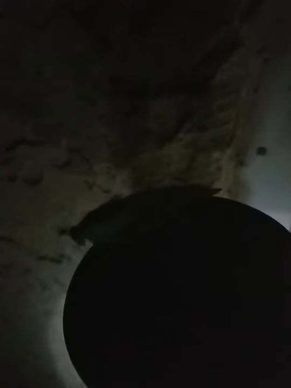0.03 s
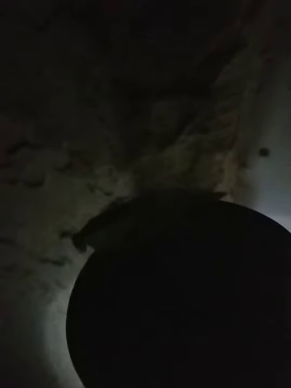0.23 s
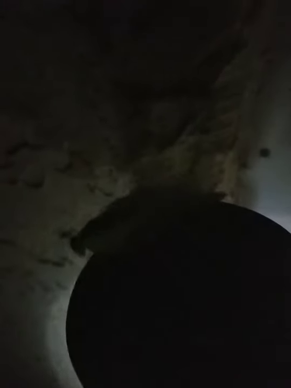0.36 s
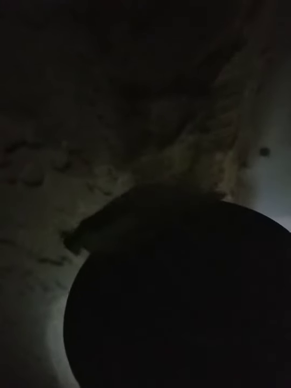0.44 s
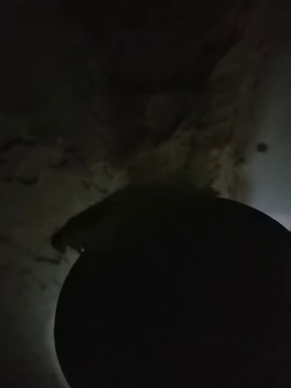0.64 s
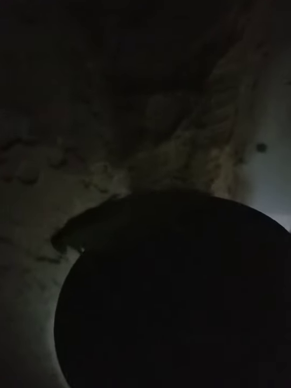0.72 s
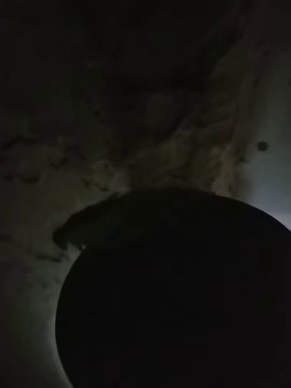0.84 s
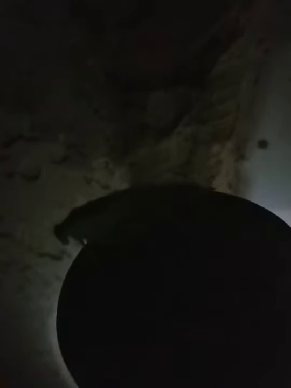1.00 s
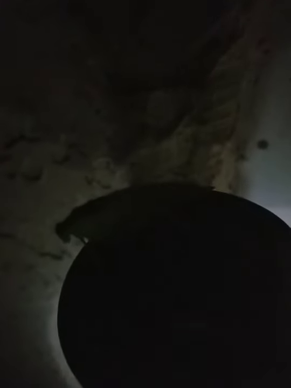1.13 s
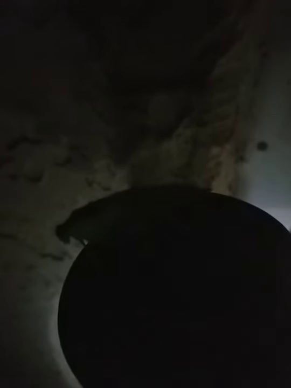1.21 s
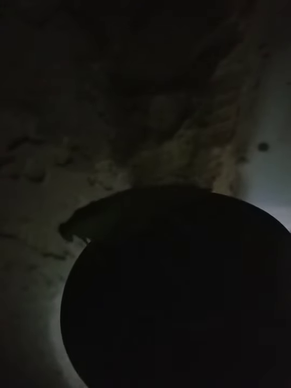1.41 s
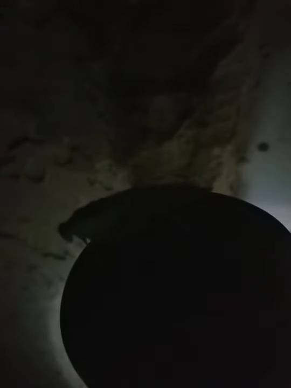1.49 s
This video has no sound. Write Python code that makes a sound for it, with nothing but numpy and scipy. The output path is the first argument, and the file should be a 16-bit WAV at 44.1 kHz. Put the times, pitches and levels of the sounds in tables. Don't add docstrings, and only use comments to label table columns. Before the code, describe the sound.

A katydid very close to a stereo microphone gives two faint ticks, then five dry, buzzing rasps in quick succession, with short outdoor echoes; low traffic rumble and faint crickets sit behind, dropping sharply as the song begins.

```python
import sys
import numpy as np
from scipy import signal
from scipy.fft import rfft, irfft, next_fast_len
from scipy.io import wavfile
from scipy.ndimage import uniform_filter1d, minimum_filter1d

SR = 44100
rng = np.random.default_rng(int(sys.argv[2]) if len(sys.argv) > 2 else 0)


def field_ratio(decibels):
    return 10 ** (np.asarray(decibels, dtype=float) / 20)


def wav_out(sig):
    wavfile.write(sys.argv[1], SR, np.round(np.clip(np.atleast_2d(sig).T, -1, 1) * 32767).astype(np.int16))


N = 68355
TIME_S = np.arange(N) / SR
OPPOSITE = np.array([[1], [-1]])

# (time [s], gain [dB])
GAIN_CURVE = [
    (0, 1.5),
    (0.2403, 1),
    (0.2415, -19),
    (.293, -15.5),
    (0.299, -19),
    (.318, -18.5),
    (.323, -23.5),
    (.68, -27),
    (.76, -24.5),
    (1.55, -24.5),
]
# (frequency [Hz], level [dB], t60 [s], growth over the stroke [dB],
# left over right [dB], left lag [samples])
WING_MODES = [(7935, -17, 0.0083, -4, -2, -5), (8220, -23.5, 0.012, -6, -2, -5),
              (6400, -22, .003, -6.5, 0.5, -6), (9376, -21.5, .004, 15.5, -2, 10),
              (10950, -8.5, 0.0023, -3, -3.5, 9), (12265, -11, .002, 9, 1.5, 8),
              (13800, -15.5, .002, 1.5, -3.5, 8), (15300, -28.5, .002, 2, -6.5, 12.5),
              (4700, -32.5, 0.0018, 28, 0, -23), (3240, -32.5, 0.0014, 21, -4, -25),
              (1828, -31, 0.0021, 22.5, -7, -24.5), (1200, -39.5, .005, 18.5, -5.5, -26.5),
              (550, -42, 0.0038, 17.5, -6, -20)]
BODY_TOP_HZ = 5000


def rms_one(x):
    return x / np.sqrt(np.mean(x ** 2) + 1e-20)


def at_hz(points, hz):
    table_hz, values = np.transpose(points)
    return np.interp(np.log(hz), np.log(table_hz + 1e-3), values)


def drift(rate_hz):
    r = np.exp(-2 * np.pi * rate_hz / SR)
    slow = signal.lfilter([1], [1, -2 * r, r * r], rng.standard_normal(N + SR))
    return rms_one(slow[SR:])


def band(x, low_hz, high_hz):
    return signal.sosfilt(signal.butter(2, [low_hz, high_hz], "band", fs=SR, output="sos"), x)


def rumble():
    # (frequency [Hz], density [dB per Hz])
    spectrum = [(42, -38), (62, -4.5), (165, -11.5), (215, -8.5), (330, -23), (670, -20.5), (1300, -29.5),
                (2200, -23)]
    # (frequency [Hz], left-right likeness [-1 to 1])
    likeness = [(60, 0.99), (240, 0.98), (950, 0.42), (3770, -0.03), (15000, -0.03)]
    out = 0
    edges = 30 * 2 ** np.arange(0, 6.6, .5)
    white = rng.standard_normal((2, 2, N))
    for k, (low, high) in enumerate(zip(edges, edges[1:])):
        mid, side = band(white[k % 2], low, high)
        hz = np.sqrt(low * high)
        alike = np.clip(at_hz(likeness, hz), -1, 1)
        stereo = np.sqrt(1 + alike) * mid + np.sqrt(1 - alike) * side * OPPOSITE
        out = out + field_ratio(at_hz(spectrum, hz) + 0.5 * drift(24)) * stereo
    dulled = signal.sosfilt(signal.butter(4, 1250, fs=SR, output="sos"), out)
    return field_ratio(-38.5) * rms_one(dulled)


def drone():
    # (time [s], level [dB])
    swell = [
        (0, -56),
        (.7, -46.5),
        (.8, -42),
        (1.02, -37.5),
        (1.08, -47.5),
        (1.16, -46.5),
        (1.26, -47.5),
        (1.55, -44.5),
    ]
    center_hz, width_hz = 68.03, 23
    hum = band(rng.standard_normal(N), center_hz - width_hz / 2, center_hz + width_hz / 2)
    return field_ratio(np.interp(TIME_S, *np.transpose(swell))) * rms_one(hum)


def crickets():
    # (frequency [Hz], width [Hz], level [dB], throb rate [Hz], throb depth [dB])
    choruses = [(2665, 503, -52.5, 35, 2), (4706, 560, -53, 40, 2.5), (5780, 660, -61, 30, 2)]
    hiss = band(rng.standard_normal((2, N)), 6000, 15900)
    out = field_ratio(-65) * rms_one(hiss)
    for hz, width_hz, db, rate_hz, throb_db in choruses:
        edges = hz - width_hz / 2, hz + width_hz / 2
        mid, side = band(band(rng.standard_normal((2, N)), *edges), *edges)
        out += field_ratio(db + throb_db * drift(rate_hz)) * rms_one(mid + 0.23 * side * OPPOSITE)
    return out


def air():
    level_db, sink_share = -58, .6
    gain_db = np.interp(TIME_S, *np.transpose(GAIN_CURVE))
    noise = band(rng.standard_normal((2, N)), 1500, 6200)
    return field_ratio(level_db + sink_share * gain_db) * rms_one(noise)


def teeth():
    # (time [s], level [dB])
    ticks = [
        (0.1981, -35),
        (.2022, -24.5),
    ]
    # (first touch [s], full grip [s], last catch [s])
    strokes = [
        (.2418, .2525, .2908),
        (.3205, .328, .3785),
        (.4115, .4205, .4675),
        (.503, .511, .5625),
        (.598, .606, .6515),
    ]
    # (level [dB], body thump [dB])
    effort = [
        (29.6, -2),
        (30.5, 1.5),
        (29.9, 4),
        (26.9, 4),
        (31, 4.5),
    ]
    soft_gap_s, firm_gap_s, late_gap_s = .0012, .0019, .0023
    jitter_early, jitter_late = .07, .3
    catch_pause_s, rebound_s = .004, .0012
    tooth_spread_db, catch_db = 1.5, 3

    rows = [(s, db, 1.1, -30, *np.zeros(len(WING_MODES))) for s, db in ticks]
    for (touch, grip, catch), (db, thump_db) in zip(strokes, effort):
        chance = rng.standard_normal((60, 2 + len(WING_MODES)))
        for k, s in enumerate(np.arange(touch, grip - firm_gap_s, soft_gap_s)):
            own = chance[-k - 3]
            soft_db = np.interp(s, [touch, grip], [-17, -7])
            late_s = jitter_early * soft_gap_s * own[0]
            rows.append((s + late_s, db + soft_db, .6, thump_db - 11.5, *own[2:]))
        s, k = grip, 0
        while s < catch - catch_pause_s:
            own = chance[k]
            done = (s - grip) / (catch - grip)
            rows.append((s, db + tooth_spread_db * own[1], done, thump_db, *own[2:]))
            gap_s = firm_gap_s + (late_gap_s - firm_gap_s) * done
            jitter = jitter_early + (jitter_late - jitter_early) * done
            s += gap_s * np.exp(jitter * own[0])
            k += 1
        end_db, end_thump_db = db + catch_db, thump_db - 13.5
        rows.append((catch, end_db, 1.2, end_thump_db, *chance[-1, 2:]))
        rows.append((catch + rebound_s, end_db - 6, 1.2, end_thump_db, *chance[-2, 2:]))
    return np.transpose(rows)


def resonance(force, hz, t60):
    r, w = field_ratio(-60 / (t60 * SR)), 2 * np.pi * hz / SR
    ringing = signal.lfilter([0, np.sin(w)], [1, -2 * r * np.cos(w), r * r], force + 1e-18)
    return band(ringing, hz / 1.45, min(hz * 1.7, .45 * SR))


def delayed(x, lag):
    size = next_fast_len(N)
    turn = np.exp(-2j * np.pi * np.arange(size // 2 + 1) / size * lag)
    return irfft(rfft(x, size) * turn, size)[:N]


def katydid():
    mirror_delay_s, mirror_top_hz = .0004, 9000
    mode_spread_db, scrape_db, scrape_s = 2.0, -18, .0008
    s, db, done, thump_db, *chance = teeth()
    out = np.zeros((2, N))
    smear = np.exp(-np.arange(300) / (SR * scrape_s))
    for k, (mode, own) in enumerate(zip(WING_MODES, chance)):
        hz, level_db, t60, growth_db, pan_db, lag = mode
        in_body = hz < BODY_TOP_HZ
        at = ((s + mirror_delay_s * (hz < mirror_top_hz)) * SR).astype(int)
        hit_db = db + level_db + growth_db * (done - .5) + mode_spread_db * own + thump_db * in_body
        hits = np.zeros(N)
        hits[at] = (-1) ** (k // 2) * field_ratio(hit_db)
        shared, apart = rng.standard_normal((2, N))
        rubbing = shared + (.3 + .5 * in_body) * apart * OPPOSITE
        force = hits + field_ratio(scrape_db) * np.convolve(hits, smear)[:N] * rubbing
        left, right = resonance(force, hz, t60)
        left = delayed(left, lag)
        out += [left * field_ratio(pan_db / 2), right * field_ratio(-pan_db / 2)]
    return out


def walls(x):
    near_delay_s, pan_db = .002, -2
    t = np.arange(SR // 2) / SR

    def tail(db, t60):
        noise = rng.standard_normal((2, len(t))) / np.sqrt(t60 * SR / np.log(1e6))
        return (t > near_delay_s) * field_ratio(db - 60 * t / t60) * noise

    bright = signal.lfilter(*signal.butter(1, 900, "high", fs=SR), x)
    dull = signal.sosfilt(signal.butter(6, 5700, fs=SR, output="sos"), x)
    wall_and_yard = tail(-12, .055) + tail(-28, .2)
    echo = signal.fftconvolve(bright, wall_and_yard, axes=1)
    echo += signal.fftconvolve(dull, tail(-19, .25), axes=1)
    return echo[:, :N] * field_ratio(pan_db * OPPOSITE / 2)


def scene():
    night = rumble() + drone() + crickets() + air()
    song = katydid()
    return night + song + walls(song)


def roll_off(x):
    return signal.sosfilt(signal.butter(12, 16830, fs=SR, output="sos"), x)


def record(dry):
    ceiling = .95
    x = dry * field_ratio(np.interp(TIME_S, *np.transpose(GAIN_CURVE)))
    x = signal.sosfilt(signal.cheby2(20, 60, 16050, fs=SR, output="sos"), x)
    room = np.minimum(1, ceiling / (np.abs(x).max(axis=0) + 1e-9))
    held = minimum_filter1d(room, size=81)
    smooth = uniform_filter1d(uniform_filter1d(held, size=40), size=40)
    return roll_off(x * smooth)


dry = scene()
out = record(dry)
wav_out(out)
```